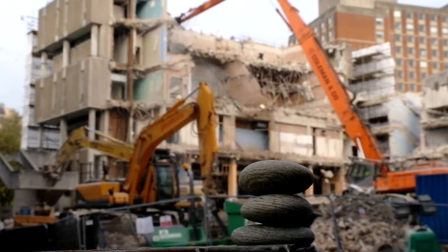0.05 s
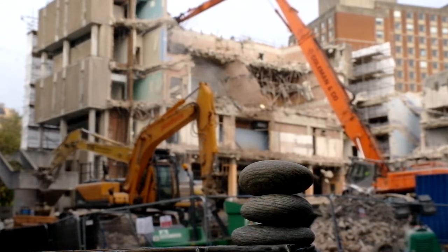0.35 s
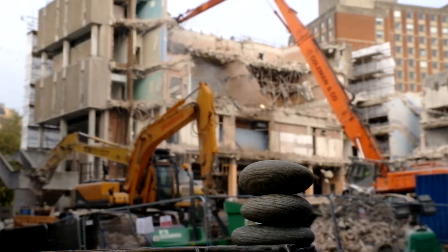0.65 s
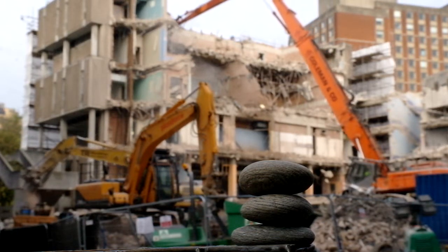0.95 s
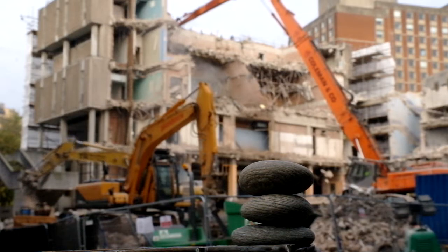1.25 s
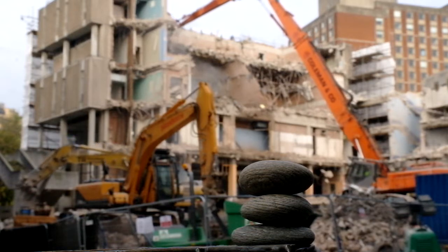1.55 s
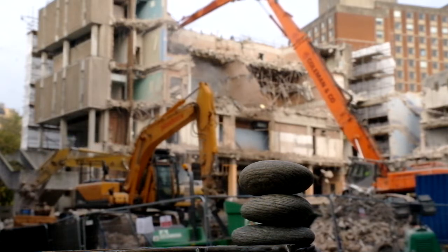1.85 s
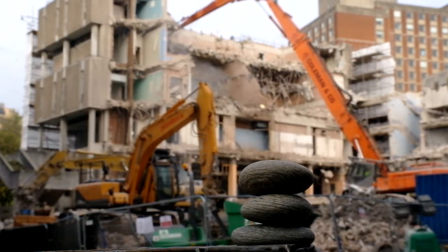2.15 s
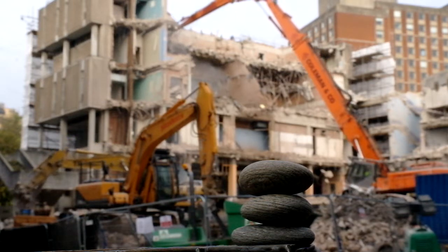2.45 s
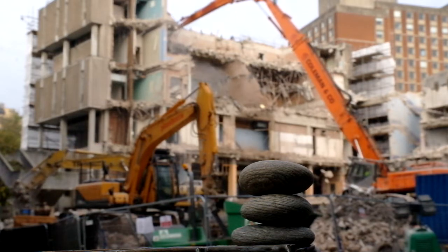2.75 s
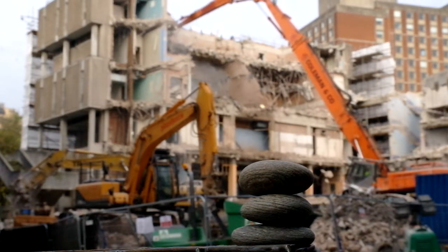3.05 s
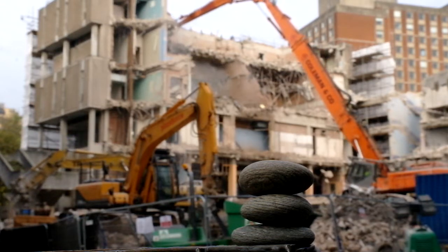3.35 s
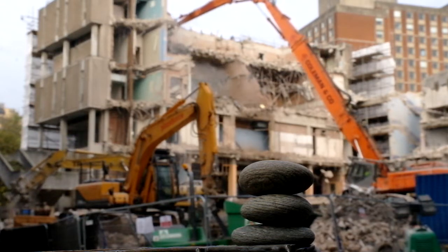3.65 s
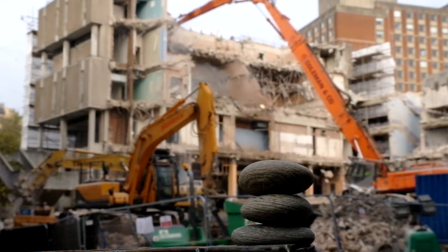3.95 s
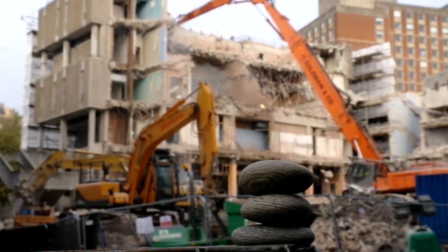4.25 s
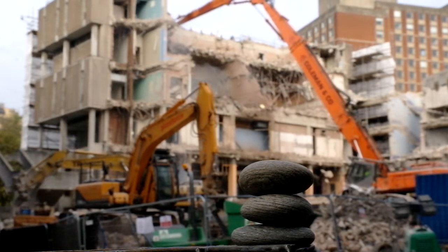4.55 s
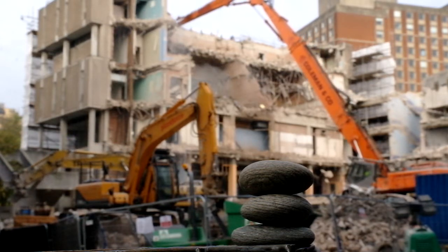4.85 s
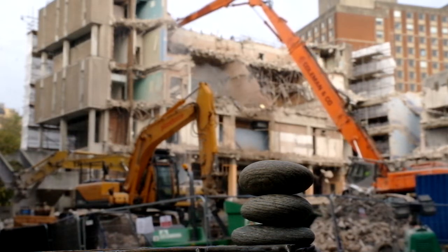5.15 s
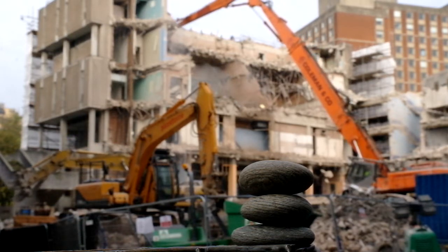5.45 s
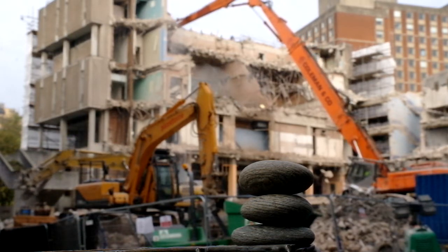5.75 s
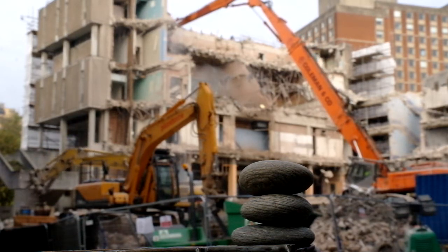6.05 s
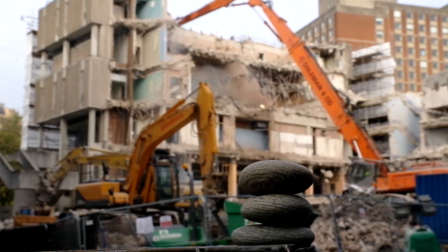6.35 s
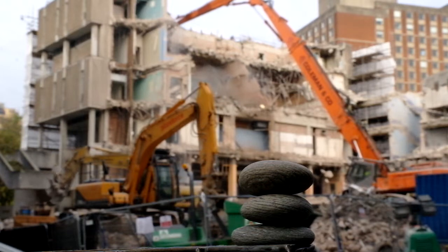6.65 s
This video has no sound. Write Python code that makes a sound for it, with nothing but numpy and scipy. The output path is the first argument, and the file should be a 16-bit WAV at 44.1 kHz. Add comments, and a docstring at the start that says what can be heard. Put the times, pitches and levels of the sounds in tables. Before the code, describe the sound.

Diesel excavators roar steadily while a steel bucket clangs, screeches and grinds on breaking concrete, with dry joints squeaking.

```python
"""A steady din of diesels and hydraulic pumps: excavators pull down a concrete building across the site.
The roar swells and a pump whines as an arm moves. Over this bed a bucket knocks, squeals and
screeches on concrete, loaded joints groan in stick-slip and dry pins squeak. The concrete grinds
and snaps, dust and pebbles trickle down, and the walls around throw the wrecking work back."""
import sys
import numpy as np
from scipy import signal
from scipy.fft import rfft, irfft, next_fast_len
from scipy.io import wavfile

SR = 44100
rng = np.random.default_rng(int(sys.argv[2]) if len(sys.argv) > 2 else 0)


def dump(signal):
    """Clip the signal to [-1, 1] and save it as 16-bit WAV at the path in sys.argv[1]."""
    limited = np.clip(np.atleast_2d(signal).T, -1, 1)
    pcm = np.round(limited * 32767).astype(np.int16)
    wavfile.write(sys.argv[1], SR, pcm)


N = 295029
T = np.arange(N) / SR

# dull body of a concrete slab: (frequency [Hz], relative level [dB])
SLAB_SPECTRUM = [(40, -46), (150, -31), (300, -12.5), (470, 4), (800, 5.5), (1300, 2), (2200, 0.5),
                 (4000, -10.5), (12000, -49)]
# bright edge of fracturing concrete: (frequency [Hz], relative level [dB])
FRACTURE_SPECTRUM = [(300, -30), (1500, -9), (2700, 3), (4200, 1.5), (5200, -4), (6600, -1.5), (8500, -4),
                     (11000, -16.5), (12800, -22)]
# hiss of sliding dust: (frequency [Hz], relative level [dB])
DUST_SPECTRUM = [(300, -29), (700, -19), (2000, 8), (4200, 3), (7000, -4.5), (10000, -9.5), (12800, -25)]
# arm moves that load diesel and pump: (time [s], length [s], roar boost [dB], whine level [dB])
ARM_MOVES = [(0.043, 0.39, 2, -51), (1.886, 0.46, 1.65, -46), (2.346, 1.43, 1.96, -60),
             (3.95, 0.48, 2.5, -41), (4.603, 0.28, 1.1, -57), (5.745, 0.17, 1.9, -56)]


def bucket_knocks(thud_t60=0.64, crack_t60=0.3, ring_width_hz=24, damping_db_per_s=25):
    """Each blow thuds in the slab, cracks the concrete and rings the bucket, which the rubble damps."""
    # bucket blows: (time [s], rise [s], thud [dB], crack [dB], steel ring [dB])
    blows = [(.445, .005, -28.5, -34, -60), (.5, .005, -31.5, -40, -60), (2.383, 0.0082, -19, -17, -24),
             (2.665, 0.0026, -27.5, -39, -57), (4.086, 0.002, -30, -18, -16), (4.165, .002, -29, -37, -31)]
    # modes of the bucket: (frequency [Hz], relative level [dB], t60 without rubble [s])
    bucket_modes = [(495, -12, 1), (619, -2.5, 0.9), (1270, -2.5, 0.81), (1410, -3, 1), (1690, -4, 0.56),
                    (2380, 6.5, 0.13), (2750, 2, 0.18), (2760, 15, 0.041), (2900, -1, 0.28),
                    (3040, -6, 0.35), (3130, 0, 0.55), (3548, 0, 0.75), (3985, 1, 0.6), (4310, 2, .4),
                    (5650, -8, 0.49), (6460, -19, .3), (9200, -11, .22)]
    out, t = np.zeros(N), np.arange(SR * 3 // 4) / SR
    for start, rise_s, thud_db, crack_db, ring_db in blows:
        modes = sum(gain_of(db - 60 * t / t60) * resonance(hz, ring_width_hz, len(t))
                    for hz, db, t60 in bucket_modes)
        steel = gain_of(ring_db - damping_db_per_s * t) * modes / np.sqrt(len(bucket_modes))
        concrete = gain_of(thud_db) * thud(t, thud_t60) + gain_of(crack_db) * crack(t, crack_t60)
        add(out, start, (concrete + steel) * (1 - np.exp(-t / rise_s)))
    return out


def bucket_screech(mode_width_hz=13, rasp_db=-2, judder=0.1, judder_per_s=160):
    """Close modes of dragged steel beat against each other over a rasp; the contact judders."""
    # modes of steel dragged over concrete: (frequency [Hz], relative level [dB])
    steel_modes = [(1953, -7.5), (1980, -15), (2072, -11), (2125, -10), (2195, -14), (2277, -3),
                   (2301, -21), (2373, -7), (2425, -8), (2468, -11), (2492, -1), (2530, -5), (2578, -7.5),
                   (2629, -3)]
    # rasp of the dragged steel: (frequency [Hz], relative level [dB])
    rasp_spectrum = [(900, -38), (1800, -23), (1960, -1), (2200, -0.5), (2480, 3), (2630, -9), (2750, -29),
                     (4000, -33), (4480, -12), (5000, -15.5), (12000, -35)]
    modes = unit_rms(sum(gain_of(db) * resonance(hz, mode_width_hz, flutter=0.39)
                         for hz, db in steel_modes))
    rasp = gain_of(rasp_db) * noise(rasp_spectrum)
    contact = np.exp(judder * drift(judder_per_s))
    screeching, _, _ = bucket_strokes()
    return unit_rms((modes + rasp) * contact) * screeching


def bucket_strokes(rise_s=0.031):
    """Three envelopes, for screech, grinding and grit, that follow each drag of the bucket."""
    # drags over concrete: (time [s], length [s], fade [s], screech [dB], grinding [dB], grit [dB])
    drags = [(2.685, 0.032, 0.033, -29, -35, -42), (2.759, 0.18, 0.024, -19, -28, -25.5),
             (2.952, 0.12, 0.16, -19.5, -27.5, -33.5), (3.38, 0.026, 0.053, -37, -38, -40)]
    return sum(gain_of(levels_db)[:, None] * envelope(T - start, length, rise_s, fade_s)
               for start, length, fade_s, *levels_db in drags)


def concrete_crush(clump_db=4.0):
    """Under the bucket, concrete grinds low and spits clumps of grit."""
    _, grinding, spitting = bucket_strokes()
    grind = coloured(grains(per_s=1800, spread_db=2.5), SLAB_SPECTRUM)
    clumps = grains(per_s=3900, spread_db=1.5) * gain_of(clump_db * drift(90))
    return grind * grinding + coloured(clumps, FRACTURE_SPECTRUM) * spitting


def joint_groans(rise_s=0.038, fade_s=0.028, climb_hz_per_s=2300, sag_hz_per_s=1150, sag_db_per_s=25,
                 jitter=0.0282, rasp_db=-5, hiss_db=-13, breakup_db=3):
    """Stick-slip pulses quicken as a joint gives, then sag, sweeping its resonances over a rasp."""
    # joints giving under load: (time [s], length [s], top slip rate [Hz], level [dB], fundamental [dB])
    groans = [(.7, .16, 734, -21.5, 0.5), (4.795, 0.0536, 680, -28, -13)]
    # resonances of the steel joint: (frequency [Hz], relative level [dB])
    joint_spectrum = [(300, -30), (700, 1), (1000, -22), (1340, 0), (1700, -6), (2000, 0), (2200, 4),
                      (2380, -7), (2680, -2), (3150, -8), (3400, -11), (4250, -9.5), (5000, -17),
                      (12000, -25)]
    out, t = np.zeros(N), np.arange(SR // 3) / SR
    for start, length, top_hz, db, fundamental_db in groans:
        sagging_s = np.clip(t - rise_s, 0, length - rise_s)
        slip_hz = top_hz - climb_hz_per_s * np.maximum(rise_s - t, 0) - sag_hz_per_s * sagging_s
        cycles = np.cumsum(slip_hz * (1 + jitter * drift(350, len(t)))) / SR
        slips = np.zeros(len(t))
        for k in range(1, 12):
            harmonic_db = curve_at(joint_spectrum, k * slip_hz) + fundamental_db * (k == 1)
            flicker_db = breakup_db * drift(67, len(t))
            slips += gain_of(harmonic_db + flicker_db) * np.sin(2 * np.pi * k * cycles)
        rasp = gain_of(rasp_db) * noise(joint_spectrum, len(t))
        hiss = gain_of(hiss_db) * noise(DUST_SPECTRUM, len(t))
        force = gain_of(db - sag_db_per_s * sagging_s) * envelope(t, length, rise_s, fade_s)
        add(out, start, (unit_rms(slips) + rasp + hiss + joint_ring(slip_hz)) * force)
    return out


def joint_ring(slip_hz, mode_hz=2190, width_hz=45, capture_hz=110, ring_db=1.0):
    """One mode of the joint sings out while the third harmonic of the slips is near it."""
    detuning = (3 * slip_hz - mode_hz) / capture_hz
    return gain_of(ring_db) * resonance(mode_hz, width_hz, len(slip_hz)) / (1 + detuning ** 2)


def pin_squeaks(width_hz=21, rise_s=0.004, fade_s=0.0086, clunk_db=3, clunk_t60=0.28, crack_db=-5):
    """A pin jerks free with a clunk; friction locks on to one mode of the steel, then lets it die."""
    # jerks of dry pins, plus two high notes near 4.8 s that sound with the short joint groan: (time [s], length
    # [s], pitch [Hz], level [dB])
    jerks = [(2.752, 0.044, 817, -25), (2.971, .15, 1262, -30.5), (3.391, 0.035, 1250, -33.5),
             (4.341, 0.084, 1241, -32.5), (4.469, 0.067, 1243, -33), (4.645, 0.13, 1240, -30.5),
             (4.801, .045, 2536, -32.5), (4.815, 0.033, 4010, -34), (5.03, .08, 2575, -44)]
    out, t = np.zeros(N), np.arange(SR // 2) / SR
    for start, length, hz, db in jerks:
        clunk = gain_of(clunk_db) * thud(t, clunk_t60) + gain_of(crack_db) * crack(t, clunk_t60)
        clunk *= np.minimum(t / rise_s, 1)
        squeak = resonance(hz, width_hz, len(t)) * envelope(t, length, rise_s, fade_s)
        add(out, start, gain_of(db) * (clunk + squeak))
    return out


def tooth_squeals(low_hz=4449, low_width_hz=80, high_hz=8820, high_width_hz=30, high_db=0.5,
                  sizzle_width_hz=330, rise_s=0.0027, fade_s=0.01, sizzle_fade_s=0.052):
    """A tooth skids: two modes about an octave apart whistle under a broad, very high one."""
    # skids of the bucket's teeth: (time [s], length [s], whistle [dB], sizzle pitch [Hz], sizzle [dB])
    skids = [(2.386, 0.046, -54, 11150, -41), (2.732, 0.011, -33.5, 11520, -28),
             (2.793, 0.039, -27.5, 11500, -41), (2.866, 0.054, -30.5, 11400, -34.5)]
    out, t = np.zeros(N), np.arange(SR // 3) / SR
    for start, length, whistle_db, sizzle_hz, sizzle_db in skids:
        low = resonance(low_hz, low_width_hz, len(t))
        high = gain_of(high_db) * resonance(high_hz, high_width_hz, len(t))
        sizzle = resonance(sizzle_hz, sizzle_width_hz, len(t))
        add(out, start, gain_of(whistle_db) * (low + high) * envelope(t, length, rise_s, fade_s))
        add(out, start, gain_of(sizzle_db) * sizzle * envelope(t, length, rise_s, sizzle_fade_s))
    return out


def concrete_snaps(t60=0.17, thud_db=-13):
    """Small pieces break off: a bright crack over a light thud."""
    # pieces snapping: (time [s], level [dB])
    breaks = [(2.226, -34), (2.88, -21), (3.037, -25), (3.149, -28), (3.227, -29), (3.3, -29), (3.622, -33),
              (3.876, -34)]
    out, t = np.zeros(N), np.arange(SR // 2) / SR
    for start, db in breaks:
        add(out, start, gain_of(db) * (crack(t, t60) + gain_of(thud_db) * thud(t, t60)))
    return out


def thud(t, t60):
    """The dull, dying sound of a struck slab."""
    return noise(SLAB_SPECTRUM, len(t)) * gain_of(-60 * t / t60)


def crack(t, t60, shower_db=-2.5, snap_db=-6.5, snap_s=0.0048):
    """A snap, then a dying shower of small fractures."""
    breaking = gain_of(shower_db - 60 * t / t60) + gain_of(snap_db) * np.exp(-t / snap_s)
    return coloured(grains(per_s=7000, spread_db=4.0, size=len(t)), FRACTURE_SPECTRUM) * breaking


def diesels(idle_db=-30.5, clatter=0.025, firing_hz=61.6, waver_db=0.58, rise_s=0.21, fade_s=0.36):
    """A roar, lightly pulsed by the firings and louder with each arm move, with steady hums and whines."""
    # roar of the machines: (frequency [Hz], relative level [dB])
    roar_spectrum = [(24, -83), (40, -53), (59, -47), (79, -38), (147, -27), (217, -22), (319, -14),
                     (597, -6.5), (1070, -0.5), (1530, -4.5), (3560, -11), (3920, -9.5), (4320, -14),
                     (10600, -28), (12800, -37), (16600, -65), (22000, -120)]
    # engine orders and pump whines: (frequency [Hz], width [Hz], level [dB])
    machine_tones = [(160.4, 6, -65), (182, 6, -68), (194, 4.9, -69.5), (474.6, 14, -58.5),
                     (652, 29, -47.5), (844, 12, -46.5), (1103, 45, -51), (4570, 90, -49.5),
                     (5505, 82, -52), (7450, 80, -56.5)]
    engine_speed = 1 + 0.0099 * drift(1.82)
    firing = np.cos(2 * np.pi * np.cumsum(firing_hz * engine_speed) / SR)
    roar = coloured(rng.standard_normal(N) * (1 + clatter * firing), roar_spectrum)
    hums = sum(gain_of(db) * resonance(hz, width_hz, flutter=0.51) for hz, width_hz, db in machine_tones)
    load_db = sum(db * envelope(T - start, length, rise_s, fade_s) for start, length, db, _ in ARM_MOVES)
    return roar * gain_of(idle_db + load_db + waver_db * drift(21.12)) + hums


def pump(whine_hz=3855, width_hz=18, idle_db=-55, rise_s=0.19, fade_s=0.046):
    """A thin whine that swells as each arm move draws oil."""
    flow = sum(gain_of(db) * envelope(T - start, length, rise_s, fade_s)
               for start, length, _, db in ARM_MOVES)
    return resonance(whine_hz, width_hz) * (gain_of(idle_db) + flow)


def slew_motor(start_s=1, length_s=0.61, hum_hz=651, width_hz=10, hum_db=-43):
    """A hydraulic motor hums while a machine turns."""
    turning = envelope(T - start_s, length_s, rise_s=0.1, fade_s=0.03)
    return gain_of(hum_db) * resonance(hum_hz, width_hz) * turning


def dust(rise_s=0.083, fade_s=0.4):
    """Fine rubble hisses as it slides, then trickles out."""
    # slides of dust: (time [s], length [s], level [dB])
    slides = [(0, 0.48, -39), (1.14, 0.27, -33.5), (2.093, .25, -40), (3.29, 0.75, -40.5)]
    flow = sum(gain_of(db) * envelope(T - start, length, rise_s, fade_s) for start, length, db in slides)
    return coloured(grains(per_s=3000, spread_db=1), DUST_SPECTRUM) * flow


def pebbles(per_s=14, level_db=-49, t60=0.094):
    """Small stones tick down the heap at random."""
    t = np.arange(SR // 8) / SR
    tick = rng.standard_normal(len(t)) * gain_of(-60 * t / t60)
    ticks = signal.oaconvolve(grains(per_s, spread_db=1.5), tick)[:N]
    return gain_of(level_db) * coloured(ticks, FRACTURE_SPECTRUM)


def wall_echo(x, reflections_per_s=2000, predelay_s=0.012):
    """The walls return sparse reflections of random sign; the treble dies first."""
    # decay of the site's echo: (frequency [Hz], t60 [s])
    decay_times = [(100, 0.87), (1000, 1), (3000, 1), (6000, 0.59), (12000, 0.17)]
    taps = rng.choice([-1., 1.], SR) * (rng.random(SR) < reflections_per_s / SR)
    taps *= np.arange(SR) > predelay_s * SR
    hz, t, bands = signal.stft(taps, SR, nperseg=256)
    decay = gain_of(-60 * t / curve_at(decay_times, hz)[:, None])
    _, tail = signal.istft(bands * decay, SR, nperseg=256)
    return signal.fftconvolve(x, tail / np.linalg.norm(tail))[:N]


def resonance(hz, width_hz, size=N, flutter=0.43):
    """A ringing tone at rms 1: its pitch wanders by its width and its strength flutters."""
    wander = np.cumsum(drift(4 * width_hz, size)) * width_hz / 2
    strength = np.exp(flutter * drift(2 * width_hz, size))
    cycles = (hz * np.arange(size) + wander) / SR + rng.random()
    return unit_rms(strength * np.sin(2 * np.pi * cycles))


def grains(per_s, spread_db, size=N):
    """Sparse clicks of unequal size, at rms 1."""
    strength = gain_of(spread_db * np.minimum(rng.exponential(1, size), 4))
    polarity = rng.choice([-1, 1], size)
    return unit_rms(strength * polarity * (rng.random(size) < per_s / SR))


def noise(spectrum, size=N):
    """Noise with the given spectrum, at rms 1."""
    return coloured(rng.standard_normal(size), spectrum)


def coloured(x, spectrum):
    """Filters x by a spectrum, at rms 1."""
    size = next_fast_len(len(x))
    gains = gain_of(curve_at(spectrum, np.fft.rfftfreq(size, 1 / SR)))
    return unit_rms(irfft(rfft(x, size) * gains, size)[:len(x)])


def drift(per_s, size=N):
    """Smooth random motion at rms about 1."""
    knots = rng.standard_normal(8192)
    return 1.192 * np.interp(np.arange(size) / SR * per_s, np.arange(8192), knots)


def envelope(t, length, rise_s, fade_s):
    """Attack, hold until length, exponential release; silent before t = 0."""
    return np.clip(t / rise_s, 0, 1) * np.exp(-np.maximum(t - length, 0) / fade_s)


def curve_at(points, hz):
    """Reads a curve on a log-frequency axis."""
    point_hz, values = np.transpose(points)
    return np.interp(np.log(hz + 1), np.log(point_hz + 1), values)


def gain_of(db):
    """Decibels to amplitude."""
    return 10 ** (np.asarray(db) / 20)


def unit_rms(x):
    """Scales to rms 1."""
    return x / np.sqrt(np.mean(x ** 2) + 1e-20)


def add(mix, start_s, sound):
    """Mixes a sound in at its start time."""
    part = mix[round(start_s * SR):][:len(sound)]
    part += sound[:len(part)]


def scene(echo_db=-10):
    """The wrecking work and its echo over a bed of machines and dust, in mono."""
    work = (joint_groans() + bucket_screech() + concrete_crush() + bucket_knocks()
            + concrete_snaps() + pin_squeaks() + tooth_squeals() + pebbles())
    bed = diesels() + pump() + slew_motor() + dust()
    return (bed + work + gain_of(echo_db) * wall_echo(work))[None]


def record(dry, ceiling=0.37, cutoff_hz=12850):
    """A soft clip rounds the loudest peaks; a steep low-pass takes off the top treble."""
    rounded = dry / (1 + (dry / ceiling) ** 6) ** (1 / 6)
    lowpass = signal.firwin(511, cutoff_hz, window=("kaiser", 9), fs=SR)
    return signal.oaconvolve(rounded, lowpass[None], "same")


dry = scene()
out = record(dry)
dump(out)
```